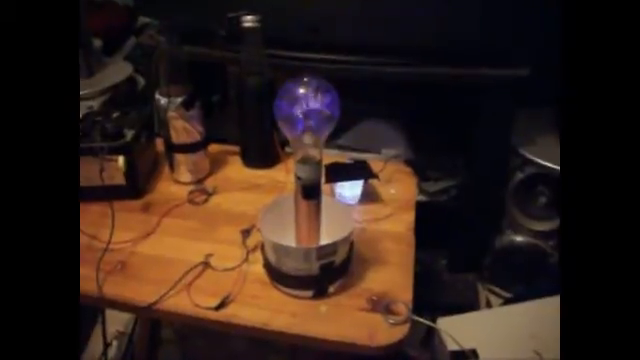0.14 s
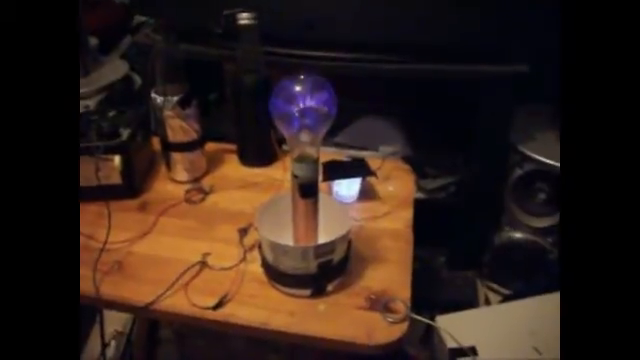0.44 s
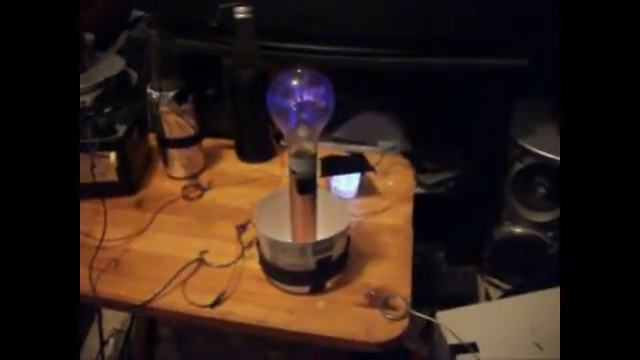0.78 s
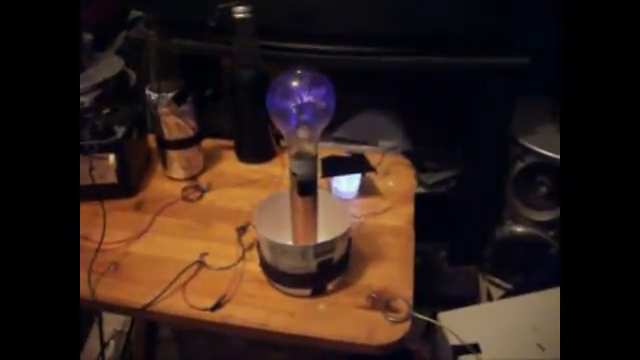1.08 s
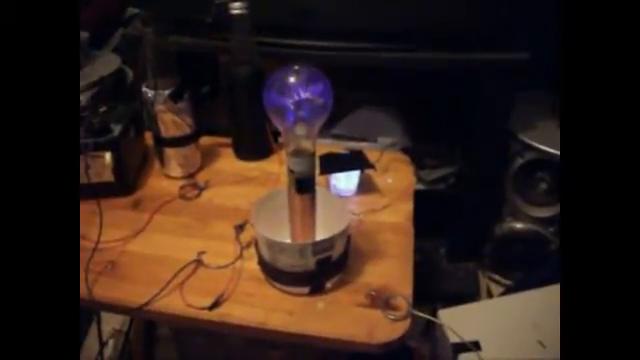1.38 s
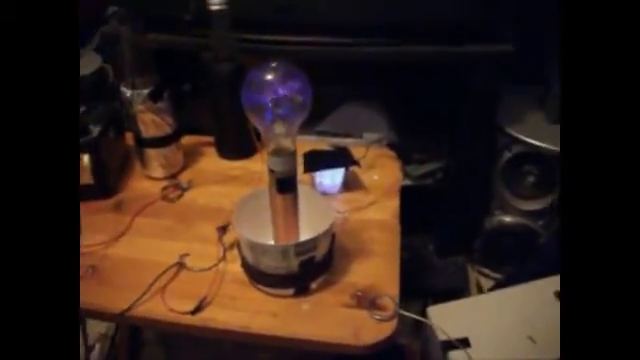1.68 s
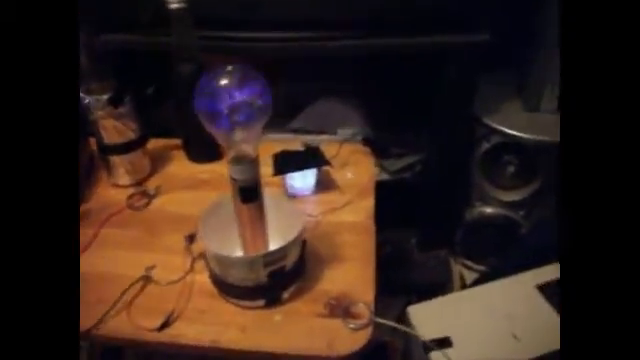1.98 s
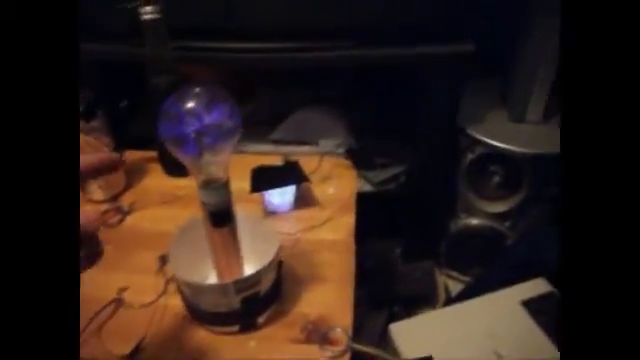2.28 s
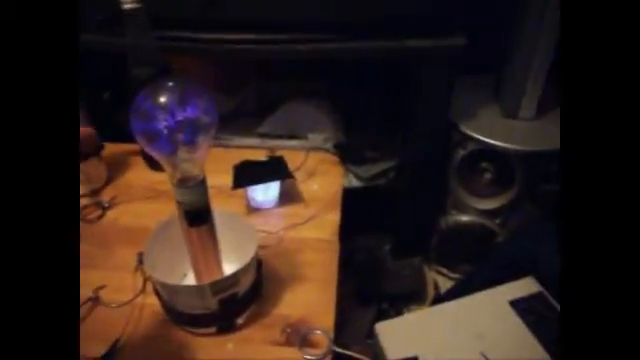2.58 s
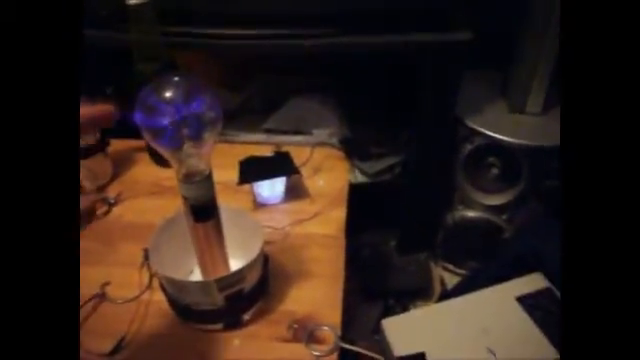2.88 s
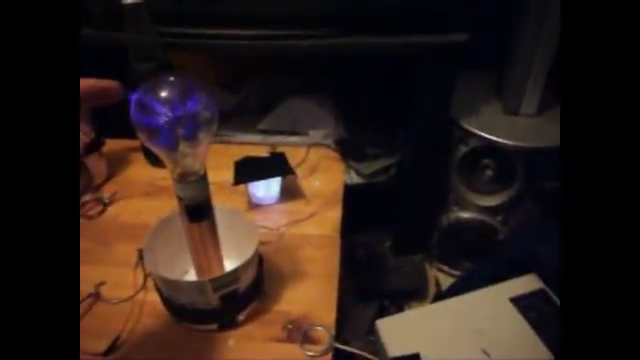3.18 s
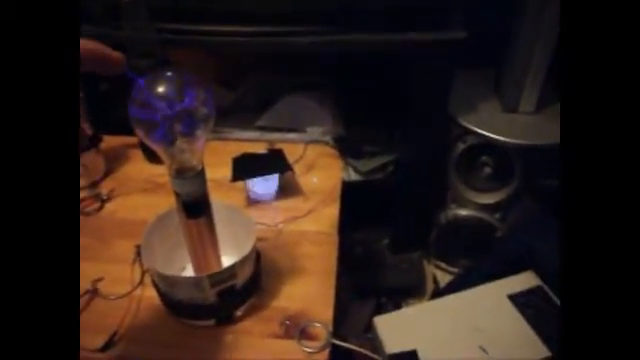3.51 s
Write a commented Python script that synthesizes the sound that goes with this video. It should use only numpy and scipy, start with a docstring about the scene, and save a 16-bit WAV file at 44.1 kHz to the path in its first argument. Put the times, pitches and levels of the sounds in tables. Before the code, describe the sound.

Loud raspy electrical buzz of a spark coil, continuous, over a low mains hum

```python
"""Spark-gap coil on a table

A small spark-gap coil on a wooden table indoors, close to a pocket camera. Once per mains cycle the gap
breaks into a short volley of sparks, with a weaker volley between; each click sets housing, table and can
ringing, and jolts once a cycle ring the glass. A sum of overtones makes the transformer's buzz; echoes and
noise tails make the room. The overdriven microphone bends the peaks one way, adding low hum and rumble."""
import sys
import numpy as np
from scipy import signal
from scipy.fft import rfft, irfft, next_fast_len
from scipy.io import wavfile
from scipy.ndimage import uniform_filter1d

SR = 44100
rng = np.random.default_rng(int(sys.argv[2]) if len(sys.argv) > 2 else 0)


def put_to_file(sound):
    """Save the sound as 16-bit audio at rate SR, in the file named by the first command-line argument."""
    columns = np.atleast_2d(sound).T  # one column per channel
    safe = np.clip(columns, -1, 1)
    whole_steps = np.round(safe * 32767)
    wavfile.write(sys.argv[1], SR, whole_steps.astype(np.int16))


def field_ratio(decibels):
    """Amplitude ratio for a level in dB (20 dB per decade); scalars and array-likes work."""
    return 10 ** (np.asarray(decibels, dtype=float) / 20)


N = 160965
LEAD = 11025  # samples the coil has already been running
MAINS_HZ = 60

# Transformer overtones: mains_multiple, rms_db (at time zero, relative), change_db_per_s
OVERTONES = [(9, -49, 0), (10, -48, 0), (11, -41, 0), (12, -38, 0), (13, -42, 0), (14, -38, 0),
             (15, -34, -3), (16, -27, -2.5), (17, -35, -3), (18, -31, -3), (19, -33, -3), (20, -33, -2),
             (21, -39, -2), (22, -40, -2)]
SWELL_MS, SWELL_SLIP_MS_PER_S = 12.9, 0.16  # when in the cycle the overtones swell together; slow slip

# Early wall echoes: delay_ms, level_db
WALL_ECHOES = [(7, -20), (11.8, -13.5), (17, -10.5)]
# Decay of the diffuse tail: frequency_hz, t60_s
ROOM_DECAY = [(300, 0.36), (1200, 0.4), (3000, 0.95), (7000, 0.66)]
# Colour of the diffuse tail: frequency_hz, relative_level_db
ROOM_COLOUR = [(300, 2.5), (800, 3), (1300, 4.5), (2100, -2), (3200, -7), (5000, 0.5), (7500, -0.5)]
TAIL_DB, WALL_DULL_HZ = -7, 2380
DRIFT_S = 0.3532  # the hand-held camera hears a new tail this often

# Spectrum of one spark at the microphone: frequency_hz, relative_level_db
SNAP_SPECTRUM = [(60, -53), (300, -29), (570, -33), (750, 2), (950, 0.5), (1250, 4), (1560, -0.5),
                 (1880, -14), (2100, -7), (2410, -20), (3240, -21), (4000, -25.5), (4400, -18), (5010, -27),
                 (6070, -31), (7000, -26), (8000, -35.5), (10000, -46.5), (17000, -104.5)]
# Modes of table and can: frequency_hz, energy_db, t60_s
TABLE_MODES = [(651.5, -24, 0.19), (699, -16, 0.029), (859, -34, 0.2), (962, -13, 0.085),
               (1048, -15, 0.032), (1127.6, -10.5, 0.028), (1182.4, -15.5, 0.17), (1278, -25.5, 0.15),
               (1430, -15, 0.04), (1530, -18.5, 0.17), (1688, -26, 0.11), (2006, -20.5, 0.027)]
# Short modes of the gap's housing: frequency_hz, relative_energy_db, t60_s
HOUSING_MODES = [(3864, -19.5, 0.0045), (2060, -28.5, 0.01), (2640, -25.5, 0.0043), (3500, -30, 0.0054),
                 (1770, -17, .008)]
# Lower set of glass modes: frequency_hz, relative_energy_db, t60_s
GLASS_LOW_MODES = [(4590, -23.5, 0.023), (6370, -32.5, 0.055), (8830, -48, .022)]
# Higher set of glass modes: frequency_hz, relative_energy_db, t60_s
GLASS_HIGH_MODES = [(4615, -28.5, 0.063), (6460, -35, .06), (8830, -44, .022)]
# The glass whistles in fits: start_s, relative_level_db, low_mode_share (0-1)
GLASS_FITS = [(0, 7, 0), (.15, 13, 0), (.2, 3.5, 0.2), (.4, 9, 0.5), (.55, -11.5, 0.15), (.61, 8, 0),
              (.7, -7, 0.15), (.76, 10.5, 0), (.95, 13.5, 0), (1, -2, 0.23), (1.6, 1, 0), (1.87, 5, 0.45),
              (2.08, 2, 0.6), (2.12, 17.5, 0.4), (2.21, 3, 0.9), (2.24, -1.5, 0.9), (2.34, 9.5, 1),
              (2.5, 9, 1), (2.57, 10.5, 0.87), (2.71, -6.5, 0.99), (2.83, 10.5, 0.7), (2.93, 6, 0.96),
              (3.14, 9, 1), (3.65, 4.5, 1)]
# A hand nears the bulb: start_s, bite_db, sharpness_scatter_db, weight_db, bite_scatter_db
HAND_EFFECT = [(0, 1.5, 5.5, -2, 9.5), (.17, 1, 7, 4, 7), (.22, -1, 5, -9, 4), (.4, -1.5, 2.5, -9, 1.5),
               (1.2, 0.5, 0, -6, 3), (2, 1, -3.5, 0.5, 3), (2.4, -7, 8, 2, 10.5), (3, -1, 6, 4.5, 9),
               (3.65, -4, 10, 3, 5.5)]
JOLT_MS, JOLT_DB, JOLT_SPREAD_DB = 15, 12, 3  # one jolt of the glass a cycle: when, relative size, scatter
EDGE_HZ, WEIGHT_HZ = 1600, 910  # sharpness acts above the first, weight below the second
THIN_HZ = 280  # so small a source sends out little below this

# Course of the discharge: start_s, strength_db, volley_start_ms (into the half-cycle), length_ms,
# other_half_cycle_db, spark_spacing_ms, sharpness_db
DISCHARGE = [(0, -17, 11.35, 5.2, -4.5, 0.88, 3), (.15, -19, 10.76, 4.1, -7, 0.87, 6),
             (.22, -14, 11.3, 5.13, -11.5, .9, 0), (0.502, -16.5, 11.3, 4.08, -41, 0.92, -4.5),
             (.75, -13.5, 11.5, 4.86, -12, 0.97, -6.5), (1, -14, 12.1, 3.8, -27.5, 0.95, -15),
             (1.302, -16, 11.56, 4.3, -20, 0.93, -3.5), (1.6, -16, 11.3, 3.97, -31, 0.94, -4.5),
             (1.85, -16, 11.46, 4.5, -15, 1, 0), (2.082, -14.5, 10.6, 6.4, -13.5, 0.99, -2),
             (2.118, -17, 12.5, 3.95, -38, 0.97, 2.5), (2.448, -17.5, 12, 3.8, -30.5, 0.97, 1.5),
             (2.8, -14, 13.2, 4.7, -15.5, 0.95, 1.5), (3.101, -19, 12.7, 4.5, -20.5, 0.98, 3),
             (3.402, -15, 12, 4.07, -44, 0.95, 3), (3.65, -20, 10.4, 6.5, -35, 0.95, 7.5)]
# Volleys that come out slightly weaker or stronger: start_s, change_db
UNEVEN_VOLLEYS = [(.264, -1.5), (1.797, -2), (2.932, -2), (3.047, 2.5)]
START_JITTER_MS, LENGTH_SPREAD = 0.25, 0.13  # per volley; spreads are log standard deviations
SPACING_SPREAD, PACE_SPREAD = 0.15, 0.06  # spacing scatter per spark, per volley
SPARK_DB, VOLLEY_DB = 2.5, 1.9  # size scatter per spark, per volley
FADE_MS, GROW_DB_PER_MS = 0.56, 0.9  # soft end of a volley; build-up within it

LEVELLER_S, LEVELLER_SHARE = 0.061, 0.55  # gain control: averaging window, how far it evens the level
BEND, BEND_ABOVE, BEND_HZ = 0.31, 0.02, 780  # square term: extra in the bass, everywhere, corner of the bass
TOP, KNEE = 0.95, 2.63  # soft ceiling: level, hardness
# The camera's treble: frequency_hz, gain_db
CAMERA_TREBLE = [(5500, 0), (6500, -5), (7500, -13), (8500, -20.5), (9200, -19), (9900, -19.5),
                 (10100, -38.5)]


def along(points, hz):
    """Spectral interpolation: (Hz, value) points joined on a log frequency axis."""
    f, v = np.transpose(points)
    return np.interp(np.log(hz + 1), np.log(f + 1), v)


def filtered(x, response):
    """Linear filtering: the spectrum of x times a complex response of frequency."""
    m = next_fast_len(x.shape[-1] + SR // 2)
    spectrum = rfft(x, m) * response(np.fft.rfftfreq(m, 1 / SR))
    return irfft(spectrum, m)[..., :x.shape[-1]]


def causal(points, size=4096):
    """Minimum phase: folding the cepstrum of a (Hz, dB) colour gives its causal impulse response."""
    level_db = np.maximum(along(points, np.fft.rfftfreq(size, 1 / SR)), -90)
    cepstrum = irfft(np.log(field_ratio(level_db)))
    cepstrum[1:size // 2] *= 2
    cepstrum[size // 2 + 1:] = 0
    return irfft(np.exp(rfft(cepstrum)))


def ringing(modes):
    """Modal superposition: a struck body answers with decaying sines of given (Hz, energy dB, t60 s)."""
    t = np.arange(SR // 4) / SR
    response = 0
    for hz, db, t60 in modes:
        unit_energy = np.sqrt(4 * np.log(1000) / (t60 * SR))
        response = response + field_ratio(db - 60 * t / t60) * np.sin(2 * np.pi * hz * t) * unit_energy
    return response


def curves(rows):
    """Slow variation: one interpolated value per sample for each column after the time."""
    s, *cols = np.transpose(rows)
    return [np.interp(np.arange(-LEAD, N) / SR, s, c) for c in cols]


def transformer():
    """Harmonic series: mains overtones in step at one moment of the cycle swell together there."""
    t = np.arange(-LEAD, N) / SR
    lag = (SWELL_MS + SWELL_SLIP_MS_PER_S * t) / 1000
    buzz = 0
    for k, db, slope in OVERTONES:
        buzz = buzz + field_ratio(db + slope * t) * np.sqrt(2) * np.cos(2 * np.pi * k * MAINS_HZ * (t - lag))
    return buzz


def room(x):
    """Reverberation: a few dull wall echoes, and a diffuse tail dying by band that changes with drift."""
    def echoes(f):
        delayed = sum(field_ratio(db) * np.exp(-2j * np.pi * f * ms / 1000) for ms, db in WALL_ECHOES)
        return delayed / (1 + 1j * f / WALL_DULL_HZ)

    walls = filtered(x, echoes)
    hz, t, z = signal.stft(rng.standard_normal((32, SR // 2)), SR, nperseg=256)
    decay_db = along(ROOM_COLOUR, hz)[:, None] - 60 * t / along(ROOM_DECAY, hz)[:, None]
    tails = signal.istft(z * field_ratio(decay_db), SR, nperseg=256)[1]
    # overlapping stretches of sound, each with its own tail, crossfade into one another
    step = int(DRIFT_S * SR)
    fade = np.hanning(2 * step)
    padded = np.pad(x, (step, 3 * step))
    diffuse = np.zeros(len(x) + 5 * step + SR)
    for k in range(len(x) // step + 2):
        tail = tails[k % len(tails)]
        piece = signal.fftconvolve(padded[k * step:(k + 2) * step] * fade, tail / np.linalg.norm(tail))
        diffuse[k * step:][:len(piece)] += piece
    return walls + field_ratio(TAIL_DB) * diffuse[step:step + len(x)]


def glass():
    """Impulsive excitation: one jolt a cycle, of random sign, rings the low and high modes of the glass."""
    n, cycle = N + LEAD, SR // MAINS_HZ
    level_db, low_share = curves(GLASS_FITS)
    jolts = (np.arange(n) % cycle == int(JOLT_MS * SR / 1000)) * np.sign(rng.standard_normal(n))
    jolts = jolts * field_ratio(JOLT_DB + level_db + JOLT_SPREAD_DB * rng.standard_normal(n))
    low = signal.fftconvolve(jolts * low_share, ringing(GLASS_LOW_MODES))[:n]
    high = signal.fftconvolve(jolts * (1 - low_share), ringing(GLASS_HIGH_MODES))[:n]
    return low + high


def housing(clicks, bite_db, scatter_db):
    """Resonance: the gap's housing rings briefly at each click, each mode varying from cycle to cycle."""
    n, cycle = len(clicks), SR // MAINS_HZ
    luck = rng.standard_normal((n // cycle + 2, len(HOUSING_MODES)))
    luck = np.repeat(luck, cycle, axis=0)[cycle // 2:][:n].T
    bite = 0
    for mode, z in zip(HOUSING_MODES, luck):
        bite = bite + signal.fftconvolve(clicks * field_ratio(bite_db + scatter_db * z), ringing([mode]))[:n]
    return bite


def snaps(clicks, scatter_db):
    """Impulse response: each click becomes a coloured snap whose treble is sharper or duller."""
    n = len(clicks)
    sharp_db = curves(DISCHARGE)[5]
    chance = np.repeat(rng.uniform(-1, 1, n // 100 + 1), 100)[:n]
    snap = causal(SNAP_SPECTRUM)
    snap = snap / np.linalg.norm(snap)
    extra = signal.fftconvolve(clicks * (field_ratio(sharp_db + scatter_db * chance) - 1), snap)[:n]
    edge = filtered(extra, lambda f: 1 - 1 / (1 + (f / EDGE_HZ) ** 6))
    return signal.fftconvolve(clicks, snap)[:n] + edge


def bench(clicks):
    """Radiation: snaps and struck bodies add up, and so small a source sends out little bass."""
    bite_db, sharp_scatter_db, weight_db, bite_scatter_db = curves(HAND_EFFECT)
    table = signal.fftconvolve(clicks, ringing(TABLE_MODES))[:len(clicks)]
    near = snaps(clicks, sharp_scatter_db) + table + housing(clicks, bite_db, bite_scatter_db) + glass()
    low_part = filtered(near, lambda f: 1 / (1 + (f / WEIGHT_HZ) ** 8))
    near = near + (field_ratio(weight_db) - 1) * low_part
    return filtered(near, lambda f: (1j * f / (THIN_HZ + 1j * f)) ** 2)


def sparks(count=12):
    """Gap discharge: volleys of growing clicks share a set energy, one a mains cycle and a weaker between."""
    half = np.arange(-32, int(2 * MAINS_HZ * N / SR) + 2)
    half_start_s = half / (2 * MAINS_HZ)
    s, *cols = np.transpose(DISCHARGE)
    db, start, length, other_db, spacing = [np.interp(half_start_s, s, c) for c in cols[:5]]
    per_volley = rng.standard_normal((len(half), 4))
    per_spark = rng.standard_normal((len(half), count, 2))
    # times of the sparks within each volley, in ms
    spread = SPACING_SPREAD * per_spark[..., 0] + PACE_SPREAD * per_volley[:, 3:]
    steps = spacing[:, None] * np.exp(spread)
    into = np.cumsum(steps, axis=1) - steps[:, :1]
    length = (length * np.exp(LENGTH_SPREAD * per_volley[:, 0]))[:, None]
    shape = np.clip((length - into) / FADE_MS + 0.5, 0, 1)
    shape = shape * field_ratio(SPARK_DB * per_spark[..., 1] + GROW_DB_PER_MS * into)
    begin = half_start_s + (start + START_JITTER_MS * per_volley[:, 1]) / 1000
    db = db + VOLLEY_DB * per_volley[:, 2] + other_db * (half % 2)
    for when, change_db in UNEVEN_VOLLEYS:
        db = db + change_db * (abs(begin - when) < 1 / (2 * MAINS_HZ))
    size = field_ratio(db)[:, None] * shape / (np.linalg.norm(shape, axis=1, keepdims=True) + 1e-9)
    at = np.round((begin[:, None] + into / 1000) * SR).astype(int) + LEAD
    keep = (at >= 0) & (at < N + LEAD)
    return np.bincount(at[keep], size[keep], N + LEAD) * np.sqrt(SR / MAINS_HZ)


def scene():
    """Superposition: direct sparks, their reverberation and the transformer's buzz."""
    near = bench(sparks())
    return (field_ratio(-1) * (near + room(near)) + transformer())[None, LEAD:]


def levelled(x):
    """Gain control: louder stretches are turned down, quieter ones up."""
    width = int(LEVELLER_S * SR)
    power = abs(uniform_filter1d(uniform_filter1d(x ** 2, width), width)) + 1e-9
    return x * (np.mean(x ** 2) / power) ** (LEVELLER_SHARE / 2)


def roll_off(x):
    """The treble ends steeply here."""
    return signal.sosfilt(signal.butter(12, 10100, fs=SR, output="sos"), x)


def record(dry):
    """Nonlinear distortion: a lopsided, inverting microphone, mostly in the bass, under a soft ceiling."""
    dry = levelled(dry)
    bend = filtered(dry ** 2, lambda f: BEND_ABOVE + BEND / (1 + (f / BEND_HZ) ** 4))
    x = -dry + bend
    x = x / (1 + abs(x / TOP) ** KNEE) ** (1 / KNEE)
    x = filtered(x, lambda f: field_ratio(along(CAMERA_TREBLE, f)))
    return roll_off(x)


dry = scene()
out = record(dry)
put_to_file(out)
```